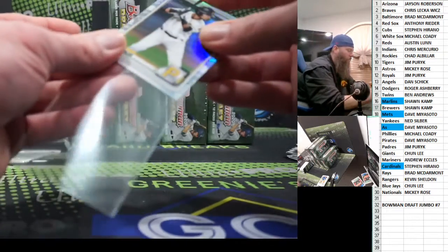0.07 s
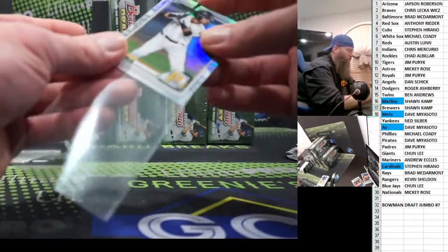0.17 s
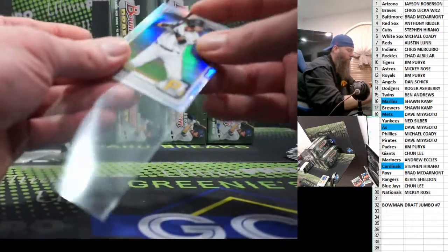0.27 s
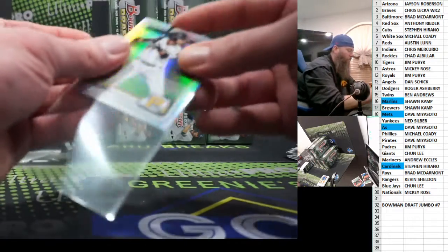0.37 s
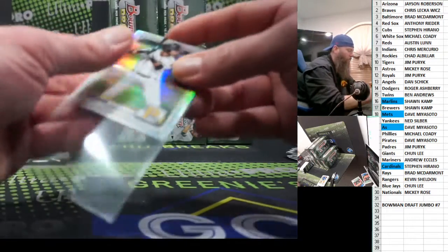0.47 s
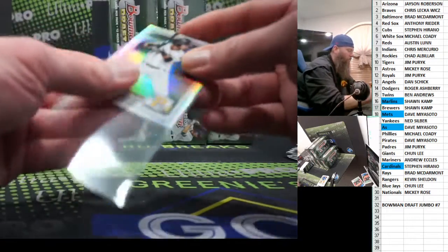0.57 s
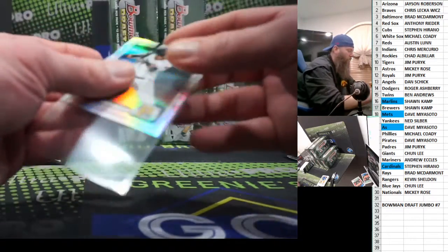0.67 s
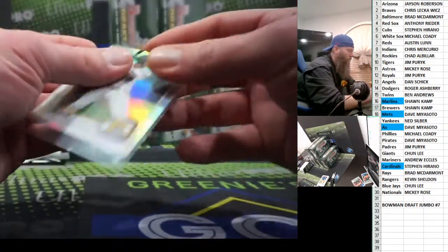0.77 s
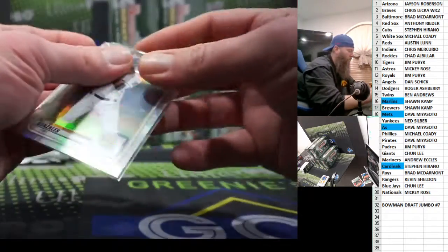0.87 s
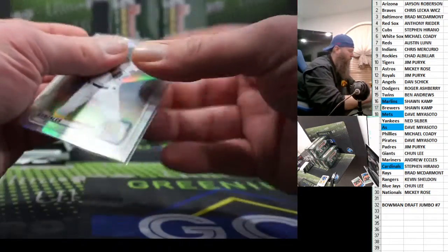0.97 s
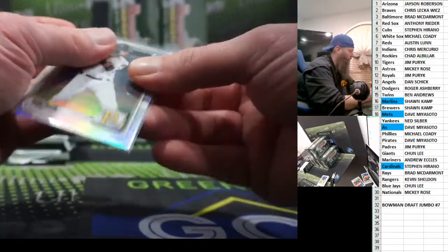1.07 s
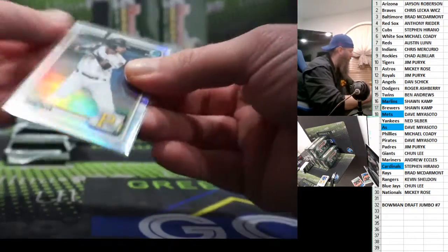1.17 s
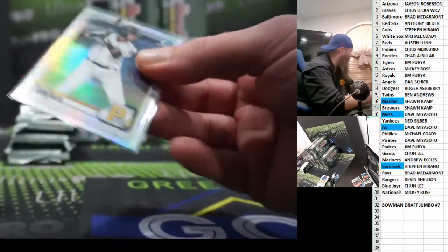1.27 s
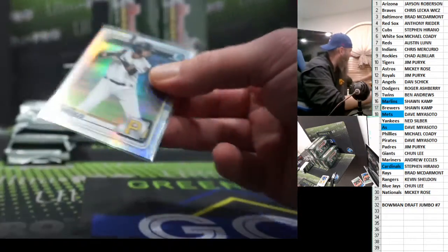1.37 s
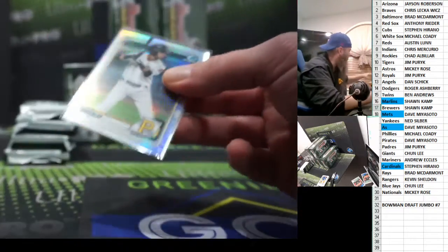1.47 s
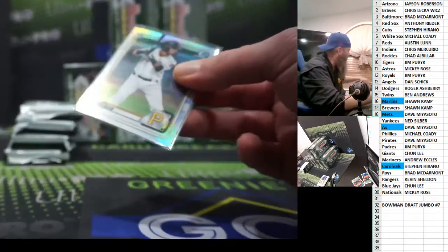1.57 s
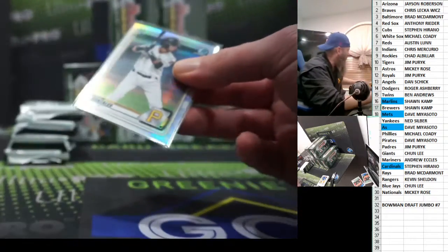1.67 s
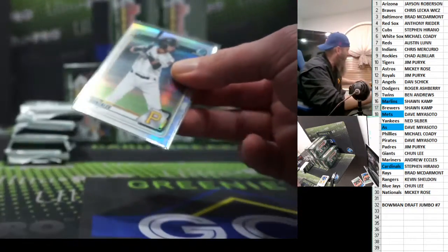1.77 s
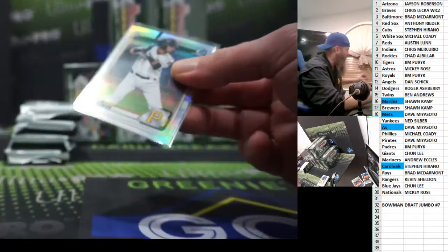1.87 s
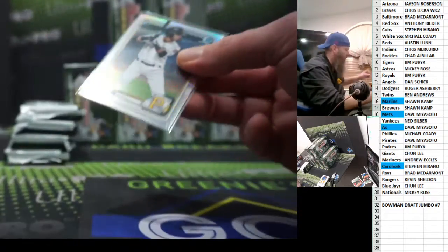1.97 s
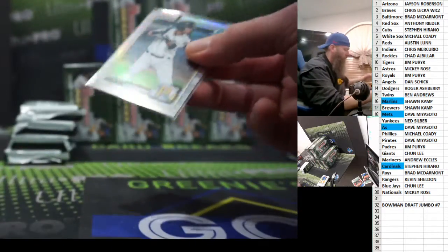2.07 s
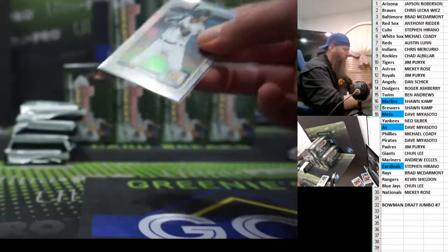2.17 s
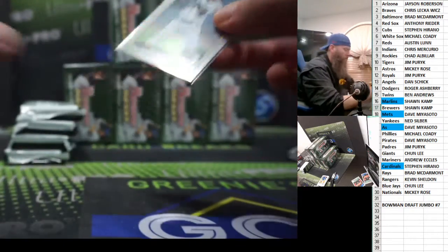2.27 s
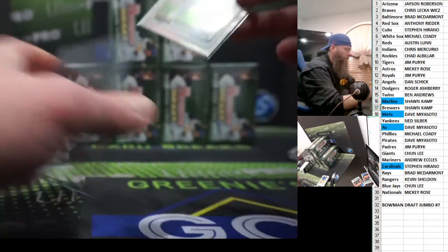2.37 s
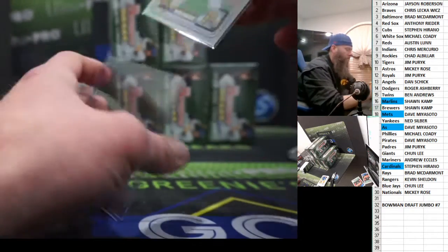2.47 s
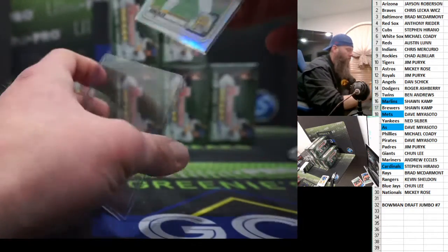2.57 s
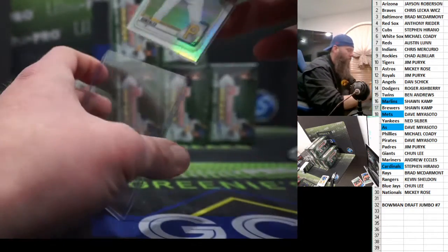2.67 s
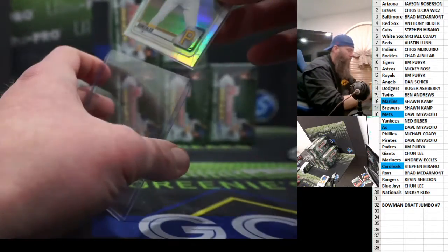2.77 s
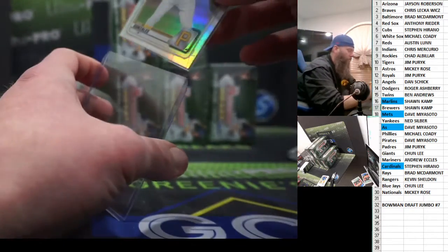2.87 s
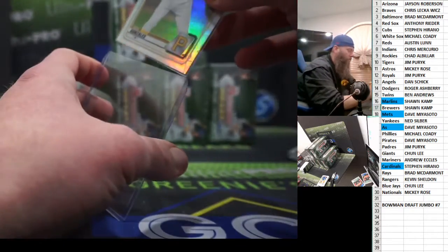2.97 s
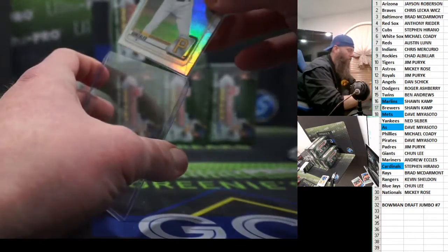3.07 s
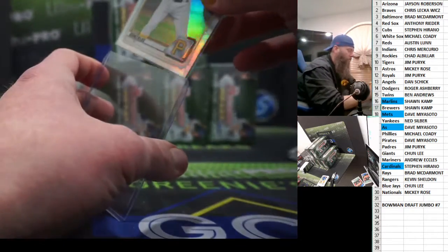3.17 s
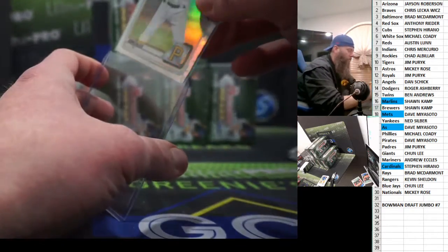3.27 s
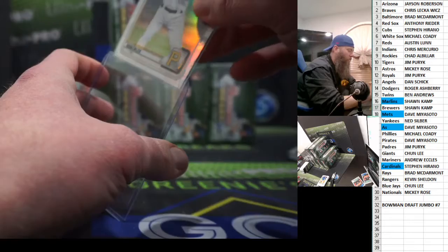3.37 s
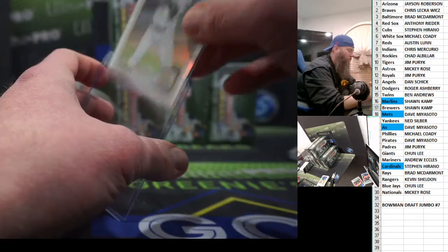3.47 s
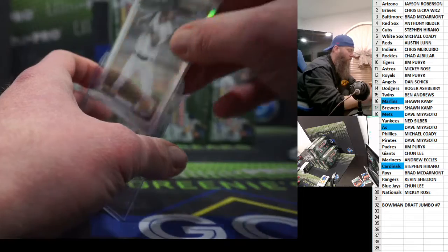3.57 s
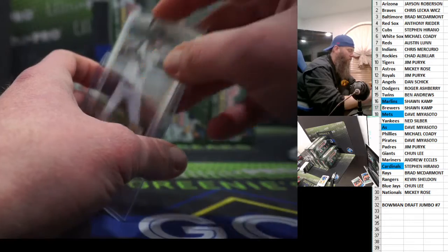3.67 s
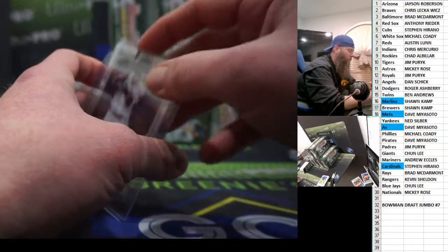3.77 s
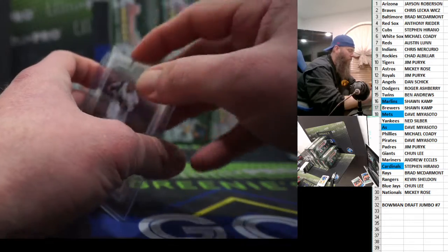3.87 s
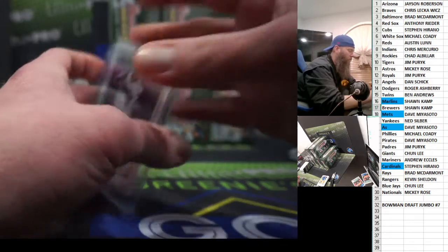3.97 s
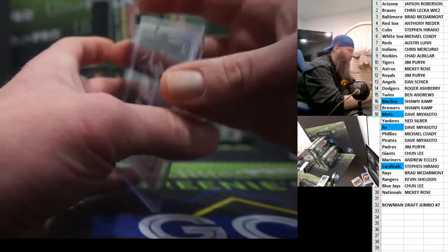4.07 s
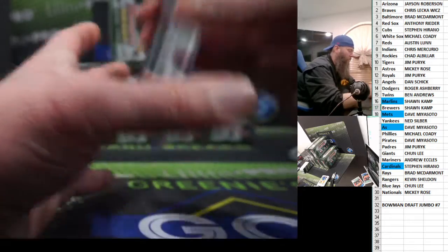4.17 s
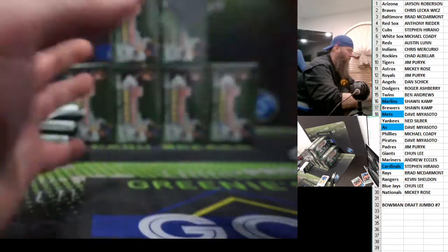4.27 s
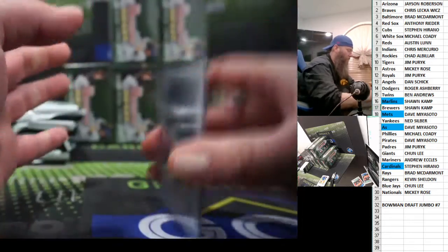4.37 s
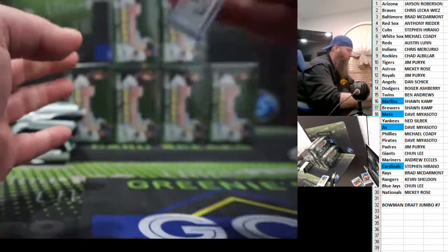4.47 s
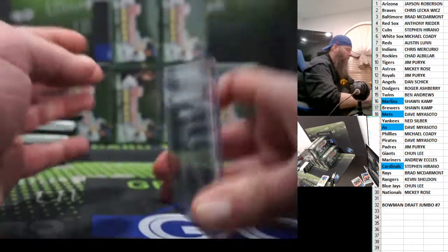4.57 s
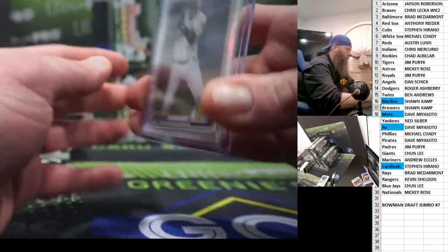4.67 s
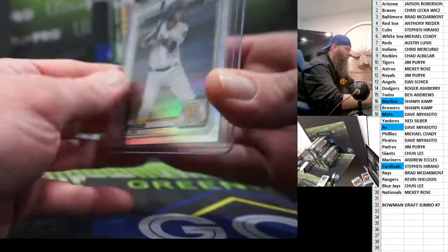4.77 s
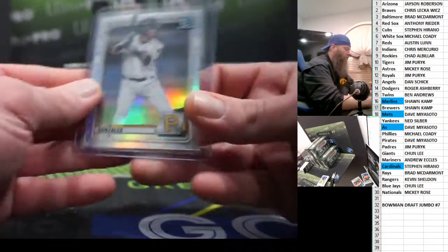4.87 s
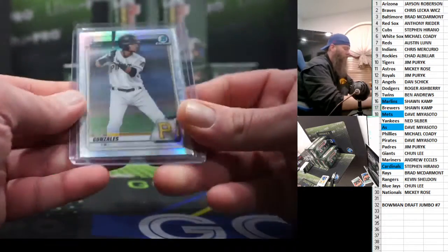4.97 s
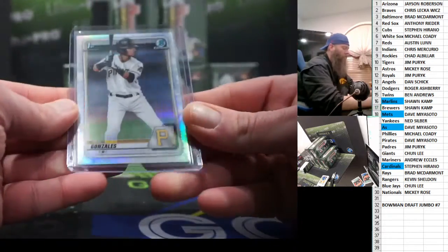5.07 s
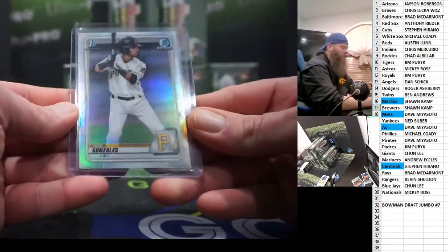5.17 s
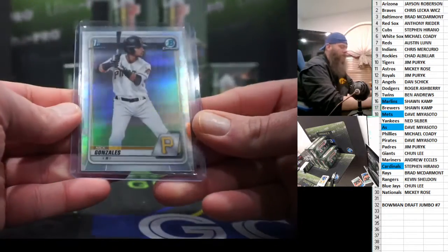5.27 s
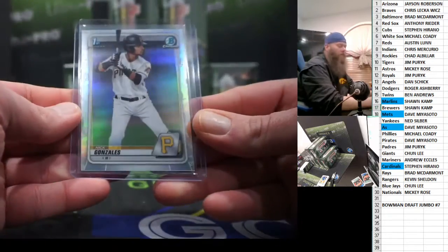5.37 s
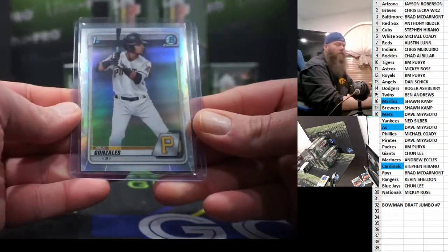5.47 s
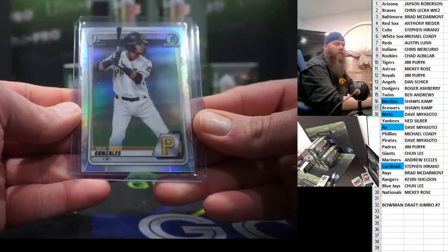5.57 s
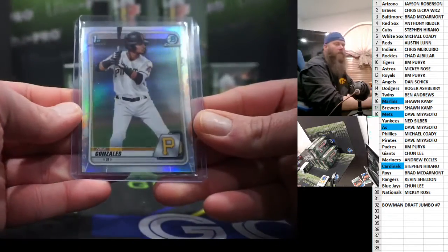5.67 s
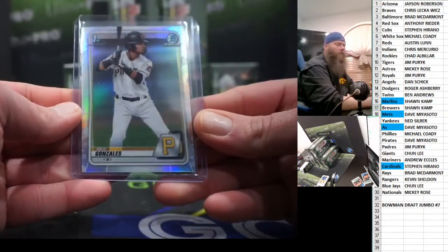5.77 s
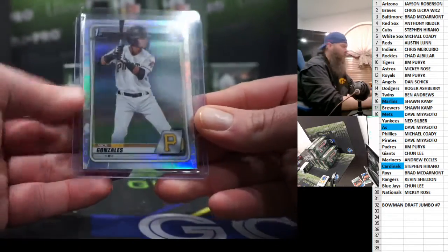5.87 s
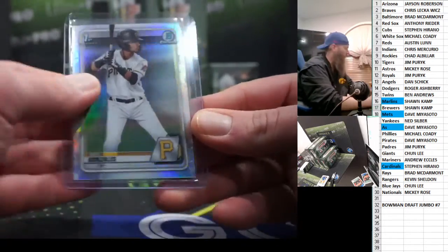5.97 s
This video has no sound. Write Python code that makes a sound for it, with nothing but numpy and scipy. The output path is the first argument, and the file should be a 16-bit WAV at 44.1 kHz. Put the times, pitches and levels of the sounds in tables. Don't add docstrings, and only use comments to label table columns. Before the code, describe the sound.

Thin plastic film rustles and ticks faintly as a card is sleeved in a quiet room, then a rigid holder knocks twice on the table.

```python
import sys
import numpy as np
from scipy import signal
from scipy.fft import rfft, irfft
from scipy.io import wavfile

SR = 44100
rng = np.random.default_rng(int(sys.argv[2]) if len(sys.argv) > 2 else 0)


def boost_factor(decibels):
    exponent = np.asarray(decibels, float) / 20
    return 10 ** exponent


def pcm_store(signal):
    levels = np.round(np.clip(np.atleast_2d(signal), -1, 1) * 32767)
    wavfile.write(sys.argv[1], SR, levels.astype(np.int16).T)


N = 264820


def rms_one(x):
    return x / np.sqrt(np.mean(x ** 2) + 1e-20)


def in_time(rows):
    s, *columns = np.transpose(rows)
    return [np.interp(np.arange(N) / SR, s, c) for c in columns]


def at_hz(points, hz):
    table_hz, values = np.transpose(points)
    return np.interp(np.log(hz), np.log(table_hz), values)


def coloured(x, spectrum):
    hz = np.maximum(np.arange(len(x) // 2 + 1) * SR / len(x), 1)
    return rms_one(irfft(rfft(x) * boost_factor(at_hz(spectrum, hz)), len(x)))


def drift(rate):
    points = rng.standard_normal(1000)
    return np.interp(np.arange(N) / SR * rate, np.arange(1000), points)


def ring(clicks, hz, t60):
    r, w = boost_factor(-60 / (t60 * SR)), 2 * np.pi * hz / SR
    return signal.lfilter([0, np.sin(w)], [1, -2 * r * np.cos(w), r * r], clicks + 1e-18)


def add(track, s, sound):
    i = round(s * SR)
    track[i:i + len(sound)] += sound[:N - i]


def dying(size, t60):
    return boost_factor(-60 * np.arange(size) / SR / t60)


def smoothing(x, t60):
    keep = boost_factor(-60 / (t60 * SR))
    return signal.lfilter([1 - keep], [1, -keep], x)


# (time [s], peak [dB], crack [dB], low thump [dB], bare push [dB])
KNOCKS = [
    (4.3362, -7, -21.5, -24.5, -8),
    (4.5414, -7, -17.5, -4, -8.5),
]
# (frequency [Hz], level [dB], t60 [s])
BLOW_MODES = [(132, -11.5, 0.18), (203, -17, 0.11), (467, -15.5, 0.042), (640, -9, 0.026),
              (923, 5.5, 0.01726), (1110, 8.5, 0.011), (1350, 6.5, 0.02), (1960, -17, 0.027)]
# (frequency [Hz], level [dB], t60 [s])
EDGE_MODES = [(2933, -4, .012), (4060, -2.5, 0.0072), (5500, -2.5, 0.01), (7013, -5, 0.0084),
              (8200, -2.5, 0.0035), (9620, -5, 0.0091), (10800, -9.5, 0.0031), (12830, -8, .008),
              (14363, -9, .008), (15500, -13.5, .007)]
# (frequency [Hz], density [dB per Hz])
RATTLE_COLOUR = [(2500, -24), (3000, -7.5), (4500, -2), (7000, -9), (10000, -9.5), (16000, -20.5)]
# (frequency [Hz], level [dB], t60 [s])
TABLE_MODES = [(253, -9, 0.41), (280.7, -11.5, .25), (373.6, -3.5, 0.27), (425, -11, .4), (471, -7.5, .15),
               (535, -12.5, 0.52), (624, -15, 0.36), (698, -7, 0.22), (806, -7, 0.2), (800, -9, 0.18),
               (856, -5, .25), (962, -1, .2), (1017, -1.5, 0.13), (1079, -2, .25), (1158, -6, 0.26),
               (1188, -2, 0.4), (1240, -6.5, 0.19), (1326, -10, 0.36), (1423, -3.5, 0.46), (1492, -8, 0.42),
               (1554, -11.5, 0.1), (1726, -11, .2), (1774, -11.5, .3), (1836, -15.5, 0.23),
               (1900, -15, 0.14), (2030, -12.5, .2), (2123, -20, 0.43)]
# (delay [s], level [dB])
ECHOES = [
    (.00142, -1),
    (.0039, -4.5),
    (.0077, -6),
]
REBOUND_S, REBOUND_DB = .0012, 4
KNOCK_ROOM_DB = -24


def knocks():
    out, size = np.zeros(N), int(SR * .8)
    tail = room_tail(ROOM_COLOUR)
    travel = rng.integers(0, SR // 200, len(TABLE_MODES))
    for s, peak_db, crack_db, thump_db, bare_db in KNOCKS:
        push = np.zeros(size)
        push[:12] = -np.hanning(12) / 4.17

        click = signal.lfilter(rng.uniform(0.52, 1, 3) * [1, .7, .5], [1], np.arange(size) == 4)
        edge = np.zeros(size)
        for k, (hz, db, t60) in enumerate(EDGE_MODES):
            edge += (-1) ** k * boost_factor(db - 5.5) * ring(click, hz, t60)
        rattle = boost_factor(-21) * coloured(rng.standard_normal(size), RATTLE_COLOUR) * dying(size, 0.04)
        crack = (edge + rattle) * boost_factor(crack_db)

        blow = np.zeros(size)
        for hz, db, t60 in BLOW_MODES:
            low_db = thump_db + 12.5 if hz < 300 else 0
            blow += boost_factor(db + low_db) * ring(push, hz, t60)
        blow = signal.lfilter(*signal.iirnotch(2480, 3.0, fs=SR), blow)

        bare = -boost_factor(bare_db) * np.pad(np.hanning(30), (2, size - 32))
        near = 0.165 * blow + 0.2 * crack + bare
        slap = boost_factor(REBOUND_DB) * np.roll(crack, round(REBOUND_S * SR))
        sound = near + 1.1 * (crack + slap)
        for delay, echo_db in ECHOES:
            lag = round(delay * SR)
            sound[lag:] -= boost_factor(echo_db) * near[:-lag]

        strengths_db = rng.normal(0, 0.65, len(TABLE_MODES))
        table = np.zeros(size)
        for (hz, db, t60), extra_db, lag in zip(TABLE_MODES, strengths_db, travel):
            table += boost_factor(db + extra_db) * ring(np.roll(push, lag), hz, min(t60, .4))
        sound += boost_factor(-27.5) * (1 - dying(size, .04)) * table

        no_bass = signal.butter(2, 90, "high", fs=SR, output="sos")
        sound = signal.sosfilt(no_bass[[0, 0]], sound)
        add(out, s, boost_factor(peak_db) * sound)
        add(out, s, boost_factor(peak_db + KNOCK_ROOM_DB) * tail)
    return out


# (frequency [Hz], t60 [s])
ROOM_T60 = [(100, 0.4), (260, 0.36), (420, 0.33), (700, 0.32), (1300, 0.34), (2000, 0.31), (4800, 0.34),
            (8000, 0.36), (13000, .14)]
# (frequency [Hz], density [dB per Hz])
ROOM_COLOUR = [(60, -32.5), (110, -12.5), (190, -13.5), (390, -10), (700, -15.5), (1050, -5), (1300, -5.5),
               (1650, -15.5), (2000, -20.5), (2450, -31), (3400, -36), (4300, -33), (7000, -40.5),
               (16000, -56.5)]
LATE_DB, LATE_STRETCH = -23.5, 2.7


def room_tail(colour):
    size, out = int(SR * .8), 0
    noise = [coloured(white, colour) for white in rng.standard_normal((2, size))]
    for k, hz in enumerate(80 * 2 ** np.arange(0, 7.7, 1 / 3)):
        third = signal.butter(2, [hz * .89, hz * 1.12], "band", fs=SR, output="sos")
        band = signal.sosfilt(third, noise[k % 2])
        t60 = at_hz(ROOM_T60, hz)
        out = out + band * (dying(size, t60) + boost_factor(LATE_DB) * dying(size, t60 * LATE_STRETCH))
    out = out / np.sqrt(np.mean(out[:SR // 50] ** 2))
    return out * (1 - dying(size, 0.022))


# (time [s], peak [dB], centre [Hz], dull part [dB], broad part [dB])
TICKS = [(.2647, -48.5, 7260, -20, -0.5), (.32, -70.5, 4630, 1, 14), (.8215, -43, 8300, -13.5, -10),
         (.8432, -39.5, 7900, -6.5, 2), (.8524, -46, 7940, -23, -6), (.919, -39.5, 8800, -12, -3),
         (1.6537, -67, 7860, 5, 4), (1.7966, -46.5, 3320, -15, -26), (2.4432, -60.5, 5170, 4, 4.5),
         (2.317, -69, 5500, -10, -6), (2.3945, -67, 5200, -4, -3), (.8585, -57, 4330, -25, -10),
         (.866, -61, 4300, -25, -13), (3.02, -72, 12920, -22, -1), (3.9012, -70, 4930, -15, -2),
         (3.9246, -57.5, 7550, -8, 3), (3.9331, -61, 5500, -13, 3), (3.9825, -65, 6800, -8, 1),
         (3.357, -69, 13300, -27, -20), (4.7491, -52.5, 8200, -3, -2), (5.6456, -67, 4500, 1, -17.5)]
# (time [s], peak [dB], centre [Hz], dull part [dB], broad part [dB])
CRINKLES = [(.9286, -53, 5300, -11, -4), (1.048, -65.5, 4200, -2, -0.5), (2.2885, -60, 4540, -7, -5),
            (2.3996, -64.5, 5400, -7, -7), (2.5636, -60, 4220, -20, -8), (4.0594, -61, 7800, 4, -9),
            (4.061, -71, 5740, -12, -18), (4.0977, -74, 5800, 14, -8), (4.1, -69, 7800, -10, -12),
            (3.922, -64, 5500, 1.5, -5), (.6117, -79, 8300, -15, -9), (.6361, -71, 4490, -15, -5),
            (1.115, -77.5, 3220, -7, 8), (4.768, -61, 5860, -6, -13), (4.7955, -58, 5855, -10, -13),
            (5.877, -70.5, 8400, -12, -5), (5.9663, -63, 8400, -0.5, -5)]
# (time [s], peak [dB], centre [Hz], dull part [dB], broad part [dB])
PING = [
    (1.813, -67.5, 3400, -35, -31),
]
# (time [s], peak [dB], centre [Hz], dull part [dB], broad part [dB])
SNAP = [
    (3.0886, -59, 3180, -22, 6),
    (3.0915, -61, 12000, -25, -9),
    (3.0921, -39.5, 11900, -31, -6),
    (3.0926, -40, 14700, -27, -10.5),
    (3.1065, -61, 12500, -25, -6),
]
# (frequency [Hz], density [dB per Hz])
TICK_COLOUR = [(1500, -17), (2100, -6), (2700, -16), (3400, -6), (4000, -3.5), (4900, 0.5), (6300, -2.5),
               (8500, -3), (11000, -5.5), (15500, -13), (17000, -10)]
TICK_T60_S, CRINKLE_T60_S, PING_T60_S, SNAP_T60_S = 0.012, 0.032, .23, 0.012
TICK_ROOM_DB, SNAP_ROOM_DB = -16, -20.5


def ticks(rows, t60, room_db=TICK_ROOM_DB):
    out, size = np.zeros(N), SR // 4
    for s, peak_db, hz, dull_db, broad_db in rows:
        white = rng.standard_normal((3, size))
        own_pitch = [(hz * .65, -40), (hz * .86, -8), (hz, 0), (hz * 1.15, -8), (hz * 1.5, -40)]
        narrow = boost_factor(-3) * coloured(white[0], own_pitch)
        bright = narrow + boost_factor(broad_db) * coloured(white[1], TICK_COLOUR)
        dull = boost_factor(dull_db) * coloured(white[2], [(900, 5), (1400, 10), (2000, 24), (2500, -29)])
        wash = boost_factor(room_db) * np.roll(bright, size // 2) * dying(size, 0.16) * (1 - dying(size, 0.056))
        burst = (bright + dull) * dying(size, t60) + wash
        add(out, s, boost_factor(peak_db - 3.5) * burst * (1 - dying(size, 0.0022)))
    return out


# (start [s], end [s], loudest [dB], top octave [dB])
PULLS = [
    (.604, .831, -73.5, 12),
    (1.927, 2.081, -77.5, 2),
    (3.28, 3.428, -85, 9),
    (3.421, 3.498, -71, 12.5),
    (3.697, 3.821, -66, 9.5),
    (5.883, 5.962, -71.5, -22),
]
# (start [s], end [s], loudest [dB], top octave [dB])
SLIPS = [(.282, .337, -70, 5), (.349, .451, -75.5, 8), (.927, 1.006, -74, -14), (1.03, 1.1, -80, -17),
         (1.198, 1.608, -80.5, 1), (1.796, 1.872, -80.5, -12), (2.152, 2.221, -65, 0),
         (2.228, 2.404, -75.5, -14), (2.411, 2.5, -75.5, 7), (2.744, 2.82, -77, 8), (2.864, 2.915, -83, 10),
         (3.156, 3.26, -79, -16), (3.5, 3.608, -74.5, 6), (3.919, 3.937, -63.5, 6),
         (3.961, 4.042, -72.5, 6), (4.795, 4.812, -67.5, -24), (4.943, 5.044, -78.5, -14),
         (5.161, 5.262, -81.5, -14), (5.962, 5.994, -64, 1)]
# (start [s], end [s], loudest [dB], top octave [dB])
GLIDES = [(.001, .265, -91, -9), (.85, .91, -75.5, -9), (1.106, 1.192, -75.5, 11.5),
          (1.61, 1.775, -80.5, -25), (1.878, 1.93, -91, 10), (2.084, 2.158, -83, -10),
          (2.51, 2.581, -78, 5), (2.593, 2.704, -85, 7), (3.611, 3.702, -73, 8.5), (3.83, 3.915, -98, -4),
          (4.07, 4.149, -82, -10), (4.155, 4.261, -75, 2), (4.28, 4.335, -73, -4), (4.69, 4.938, -79.5, -6)]
# (frequency [Hz], density [dB per Hz])
FILM_COLOUR = [(1500, -41.5), (2500, -17.5), (3450, -13), (3950, -2.5), (4700, -1), (5900, -5), (6900, -5),
               (8200, -2.5), (10000, -9), (16000, -15)]
# (frequency [Hz], density [dB per Hz])
FILM_TOP_COLOUR = [(8000, -40.5), (10000, -5.5), (12000, -6.5), (15000, -1), (16000, 0.5), (17000, -13.5)]
PULL_RISE_DB, SLIP_FALL_DB, RESTING_DB = 9.0, 7.0, -96.5
PATCH_EDGES_HZ, PATCH_DB = [5200, 7800, 11000], 1.65


def swishes():
    level = np.full(N, boost_factor(RESTING_DB))
    top = np.full(N, boost_factor(RESTING_DB - 13.5))
    kinds = [(PULLS, -PULL_RISE_DB, 0), (SLIPS, 0, -SLIP_FALL_DB), (GLIDES, 0, 0)]
    for rows, start_db, end_db in kinds:
        for start, end, db, top_db in rows:
            stroke = boost_factor(db + np.linspace(start_db, end_db, round((end - start) * SR)))
            add(level, start, stroke)
            add(top, start, stroke * boost_factor(top_db - 9.5))
    faded = smoothing([level, top], .06) + 0.22 * smoothing([level, top], .3)
    level, top = faded * boost_factor(1.0 * drift(70) + 0.6 * drift(25) - 3.5)

    creases = (rng.random(N) < 250 / SR) * boost_factor(2.3 * np.minimum(rng.exponential(1, N), 3))
    grain = 1 + .6 * signal.lfilter([1], [1, -.97], creases)
    white = rng.standard_normal((2, N)) * grain
    hiss = coloured(white[0], FILM_COLOUR)
    below = [0]
    for hz in PATCH_EDGES_HZ:
        below.append(signal.sosfilt(signal.butter(2, hz, fs=SR, output="sos"), hiss))
    below.append(hiss)
    patchy = sum((upper - lower) * boost_factor(PATCH_DB * drift(22)) for lower, upper in zip(below, below[1:]))
    return level * patchy + top * coloured(white[1], FILM_TOP_COLOUR)


# (time [s], level [dB])
RUB_LEVEL = [(0.0, -86.5), (0.79, -84.5), (0.94, -81.5), (1.6, -78.5), (1.79, -83), (2.2, -74), (2.54, -79),
             (2.75, -84.5), (3.62, -84.5), (4.15, -78), (4.7, -75.5), (4.95, -77.5), (5.06, -84.5),
             (5.428, -88), (6.0, -85.5)]
# (frequency [Hz], density [dB per Hz])
RUB_COLOUR = [(250, -27), (450, -5.5), (850, -10), (1050, -4.5), (1250, -1), (1500, -8), (2000, -8.5),
              (2500, -14.5), (3300, -12.5), (4500, -34.5)]


def rubbing():
    rub_db, = in_time(RUB_LEVEL)
    return coloured(rng.standard_normal(N), RUB_COLOUR) * boost_factor(rub_db + 2.1 * drift(40))


# (time [s], peak [dB], centre [Hz], t60 [s])
TAPS = [(.82, -68, 553, 0.14), (.851, -63, 1100, 0.091), (.8432, -58, 1900, 0.013), (.9192, -64, 1900, .02),
        (1.052, -65, 207, 0.065), (1.025, -71, 396.4, 0.03), (1.05, -63, 780, 0.036),
        (1.1, -62.5, 520, 0.068), (1.5, -66, 1180, 0.022), (1.569, -62, 580, 0.19),
        (1.653, -67, 452, 0.037), (2.075, -54.5, 1030, 0.031), (2.0755, -60, 625, 0.041),
        (2.195, -61, 2000, .03), (2.29, -65, 2150, .04), (2.196, -64.5, 1510, 0.03), (2.155, -70, 900, .03),
        (2.29, -64, 1350, .04), (2.394, -62, 1250, .04), (2.465, -62.5, 1160, .04), (2.565, -66, 1300, .04),
        (2.315, -62.5, 383, 0.054), (2.316, -62, 720, .03), (2.501, -66, 1130, 0.03),
        (2.563, -71, 537, 0.032), (3.0927, -54, 880, 0.04), (3.093, -69, 343, 0.036),
        (3.63, -66.5, 990, 0.068), (3.781, -65.5, 1020, 0.049), (3.805, -61.5, 1500, 0.035),
        (3.922, -71, 613, 0.03), (4.098, -74, 1730, 0.032), (3.97, -61, 1920, 0.36),
        (4.795, -50.5, 1190, 0.16), (5.917, -61.5, 820, 0.073), (5.965, -65, 1097, 0.05)]
# (time [s], peak [dB], centre [Hz], t60 [s])
THUMPS = [(.855, -59, 107, 0.049), (.885, -48, 65, 0.019), (1.045, -56, 127, 0.12),
          (1.058, -51.5, 92, 0.12), (1.11, -67, 198, 0.16), (2.2, -66, 128, 0.044), (2.31, -71, 147, 0.22),
          (2.5, -64.5, 106, 0.051), (2.95, -87, 71.5, 0.12), (3.1, -70.5, 70, 0.1), (3.62, -71, 118, 0.088),
          (4.8, -63.5, 136, 0.14), (.2, -79, 230, 1), (.4, -74, 230, 0.25), (3.3, -77, 196, 0.11)]
CONTACT_SHARE = 0.49


def soft_hits(rows):
    out, size = np.zeros(N), SR // 4
    for s, peak_db, hz, t60 in rows:
        band = signal.butter(3, [hz * 0.55, hz * 1.4], "band", fs=SR, output="sos")
        puff = rng.standard_normal(size) * dying(size, t60) * (1 - dying(size, 2.5 / hz))
        scuff = puff / np.sqrt(np.sum(puff ** 2))
        contact = np.arange(size) == 0
        body = signal.sosfilt(band, (1 - CONTACT_SHARE) * scuff + CONTACT_SHARE * contact)
        add(out, s, boost_factor(peak_db) * body / np.abs(body).max())
    return out


# (time [s], level [dB])
LOAD = [(0, -63), (.6, -60), (1.0, -58), (1.5, -59.5), (2.0, -55.5), (2.7, -46), (3.1, -60), (3.7, -51),
        (4.2, -43), (5.0, -47), (5.6, -49), (6.0, -44)]
# (time [s], sway [dB], rumble [dB])
PUSHES = [(0.506, -52, -62), (0.865, -60, -47), (0.914, -41, -73), (0.993, -45, -81), (1.065, -38.5, -44.5),
          (1.101, -31, -54), (1.819, -60, -67.5), (2.389, -50.5, -56.5), (2.67, -46, -70),
          (2.939, -67, -55), (3.679, -60.5, -67), (3.943, -44.5, -55), (4.192, -41, -64),
          (4.34, -37.5, -45), (4.384, -31.5, -49.5), (4.551, -35.5, -38.5), (4.588, -19.5, -38),
          (4.901, -66, -55), (5.171, -41, -53), (5.79, -64, -61), (5.931, -46, -59), (5.988, -40.5, -56)]
# (frequency [Hz], density [dB per Hz])
STIR_COLOUR = [(3, -22), (6, -5), (15, 4), (20, -1.5), (30, -24.5), (60, -77)]
# (frequency [Hz], density [dB per Hz])
RUMBLE_COLOUR = [(15, -21.5), (26, 8.5), (40, -2.5), (60, -24.5), (90, -26.5), (140, -33.5), (250, -61.5)]
SWAY_HZ, SWAY_T60_S, PUSH_S = 18.9, .72, .025
BOUNCE_HZ, BOUNCE_T60_S, BOUNCE_DB = 26.5, 0.28, 3
RUMBLE_UNDER_LOAD_DB, RUMBLE_RISE_DB_PER_S, RUMBLE_FALL_DB_PER_S = -16, 198, 161


def stand():
    load_db, = in_time(LOAD)
    t, kicks = np.arange(N) / SR, np.zeros((2, N))
    lumps = boost_factor(load_db + RUMBLE_UNDER_LOAD_DB)
    for s, sway_db, rumble_db in PUSHES:
        kicks[:, round(s * SR)] = np.sqrt(2) * boost_factor(sway_db), boost_factor(rumble_db + BOUNCE_DB)
        away_db = np.maximum(RUMBLE_RISE_DB_PER_S * (s - t), RUMBLE_FALL_DB_PER_S * (t - s))
        lumps = lumps + boost_factor(rumble_db - away_db)
    soft = np.hanning(round(PUSH_S * SR))
    shove, jolt = signal.fftconvolve(kicks, soft[None] / soft.sum(), "same")
    sway = ring(shove, SWAY_HZ, SWAY_T60_S) + ring(jolt, BOUNCE_HZ, BOUNCE_T60_S)
    stir = boost_factor(load_db) * coloured(rng.standard_normal(N), STIR_COLOUR)
    rumble = lumps * boost_factor(0.77 * drift(21)) * coloured(rng.standard_normal(N), RUMBLE_COLOUR)
    return sway + stir + rumble * (1 - dying(N, .15))


# (frequency [Hz], density [dB per Hz])
HUM_COLOUR = [(40, -15.5), (65, -6), (90, -9.5), (140, -13.5), (215, -14.5), (330, -20), (430, -29),
              (900, -28), (1220, -22.5), (1600, -33), (2200, -27), (2700, -41), (5000, -39), (16400, -52)]
HUM_DB = -81


def hum():
    return boost_factor(HUM_DB) * coloured(rng.standard_normal(N), HUM_COLOUR)


def scene():
    creases = ticks(TICKS, TICK_T60_S) + ticks(CRINKLES, CRINKLE_T60_S)
    holder = ticks(PING, PING_T60_S) + ticks(SNAP, SNAP_T60_S, SNAP_ROOM_DB)
    hands = creases + holder + soft_hits(TAPS) + soft_hits(THUMPS) + swishes() + rubbing()
    return (knocks() + hands + stand() + hum())[None]


def band_limit(x):
    return signal.sosfilt(signal.butter(12, 16540, fs=SR, output="sos"), x)


def record(dry):
    low_pass = signal.cheby2(8, 50, 16950, fs=SR, output="sos")
    mix = signal.sosfilt(low_pass, dry)
    return band_limit(mix)


dry = scene()
out = record(dry)
pcm_store(out)
```